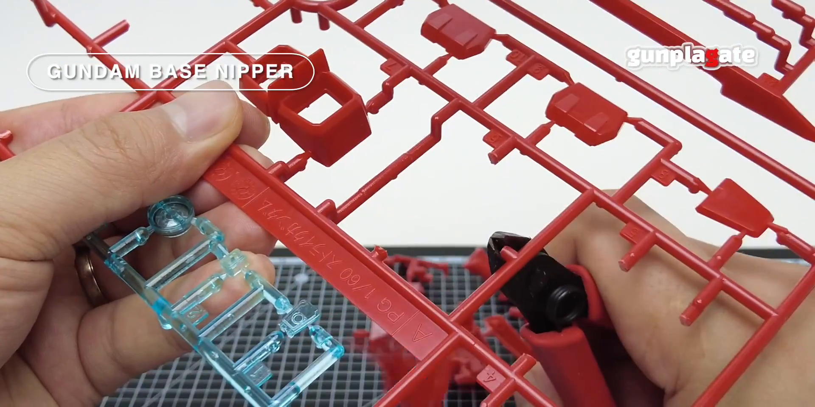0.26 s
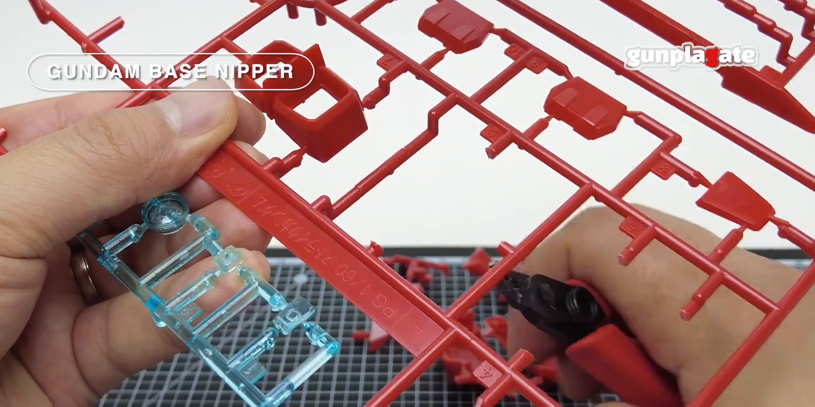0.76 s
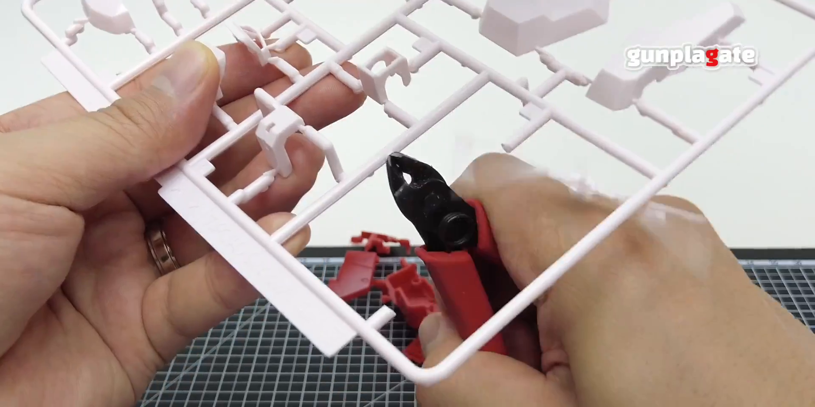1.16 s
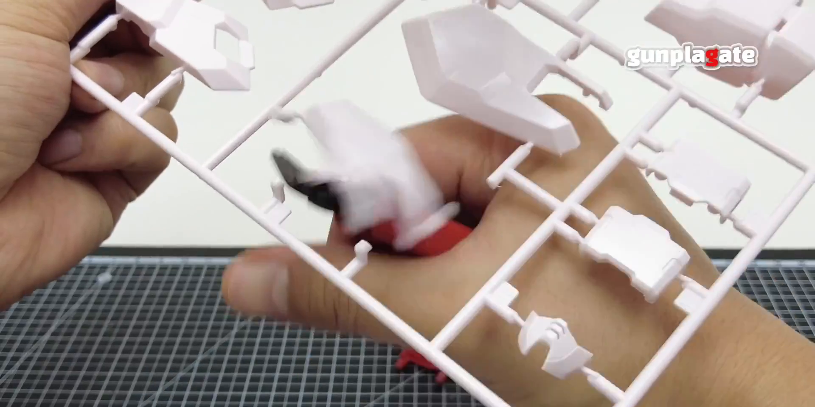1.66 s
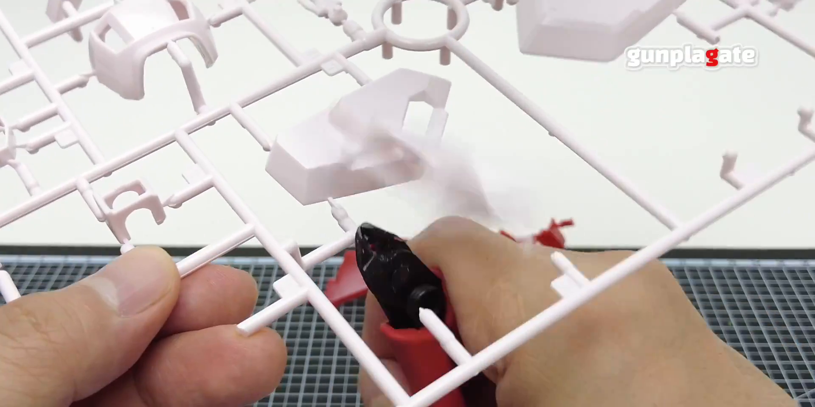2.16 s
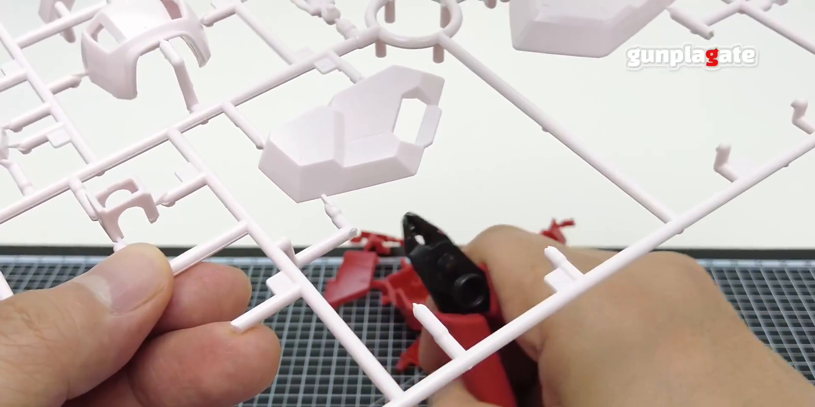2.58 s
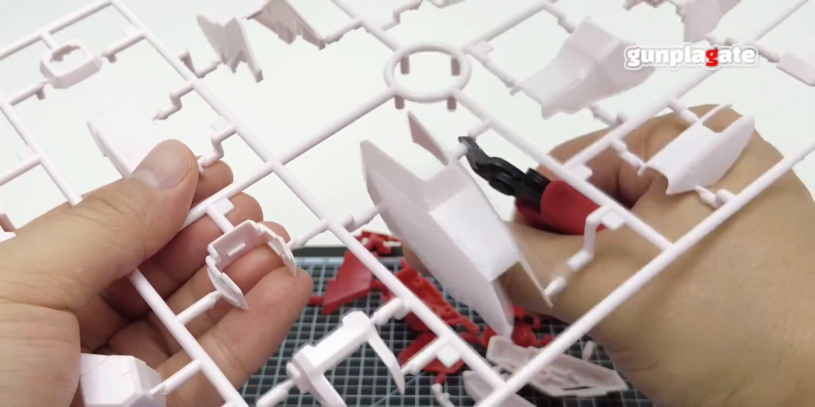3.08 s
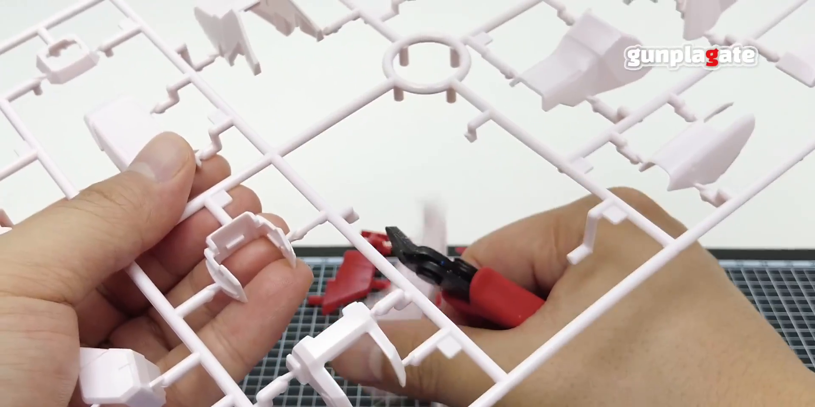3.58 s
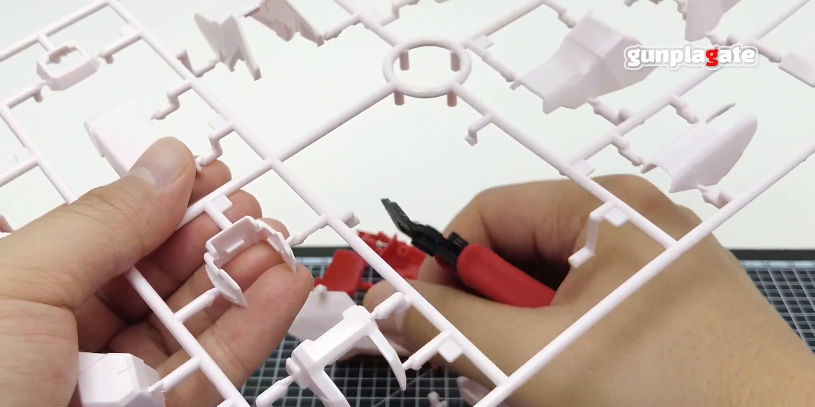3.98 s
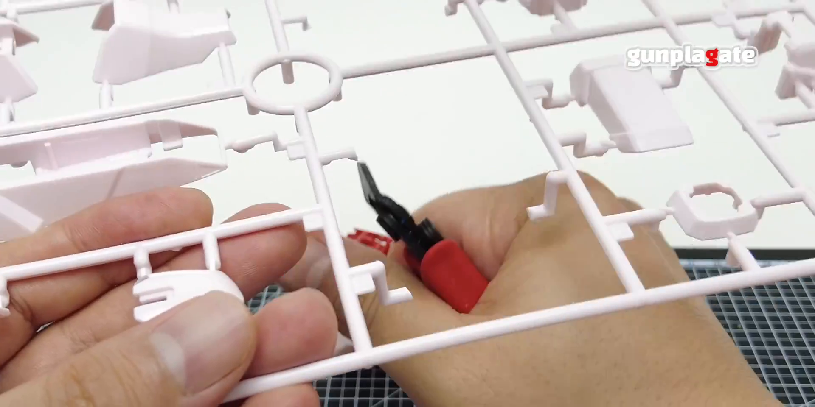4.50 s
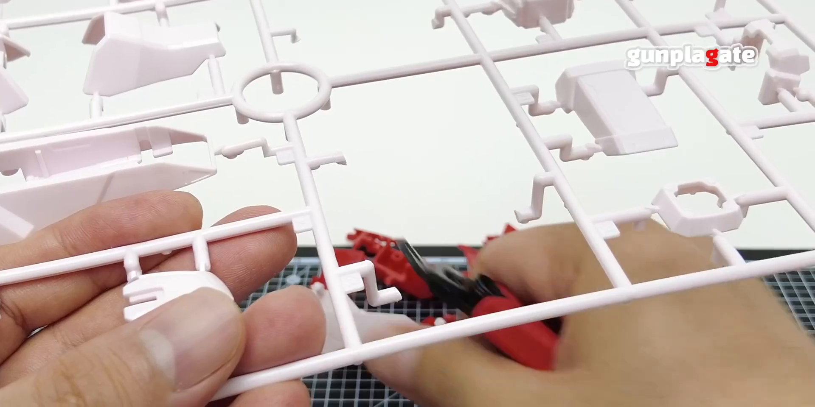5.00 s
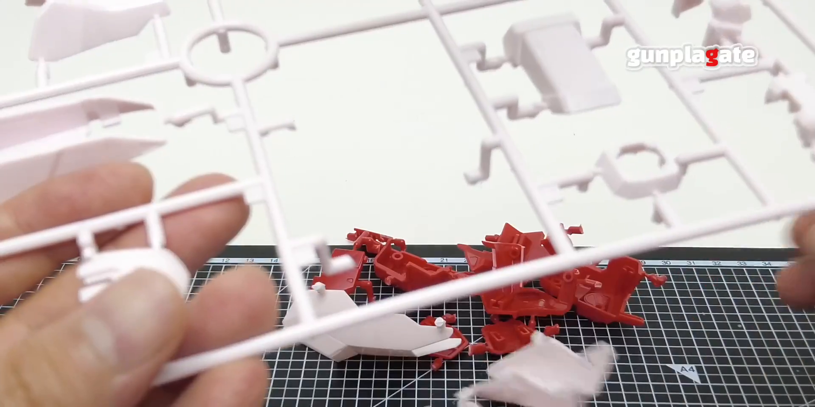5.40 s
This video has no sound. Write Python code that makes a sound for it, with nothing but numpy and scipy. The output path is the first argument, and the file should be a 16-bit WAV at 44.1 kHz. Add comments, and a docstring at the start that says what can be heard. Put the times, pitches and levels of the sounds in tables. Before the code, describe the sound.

Close and dry: about seventeen sharp snaps of cutter blades through plastic stalks, mostly in small clusters. Between them light hollow pieces bounce and chatter on a mat and a pile of parts, densest shortly after two, nearly four and five and a half seconds. Tiny faint squeaks come from the cutter joint. A short room tail and soft low rumble surround everything.

```python
"""Side cutters snip plastic parts off their runner frame, close by in a small quiet room.
Each snip is a grainy crack of shaped noise plus the ringing tones of the plastic.
Freed parts knock on the desk mat and on a heap of loose parts: the same recipe, with a thud below.
Random ticks make parts slide and chatter, and the cutter's joint squeaks in short tones.
Fading noise gives the room and the shaken frame; steady air and a low rumble lie underneath."""
import sys
import numpy as np
from scipy import signal
from scipy.fft import rfft, irfft
from scipy.io import wavfile
from scipy.ndimage import uniform_filter1d

SR = 44100
rng = np.random.default_rng(int(sys.argv[2]) if len(sys.argv) > 2 else 0)


def digitize_waveform(pressure):
    """Quantize a signal to 16-bit integers and store it at the path in sys.argv[1].

    Rows of a 2-D input are taken as channels; values are limited to [-1, 1].
    """
    field = np.atleast_2d(pressure).T
    bounded = np.clip(field, -1, 1)
    quanta = np.round(bounded * 32767).astype(np.int16)
    wavfile.write(sys.argv[1], SR, quanta)


N = 249165  # length in samples


def gain_of(db):
    """Turns decibels into a factor for the amplitude."""
    return 10 ** (np.asarray(db) / 20)


def evened(x):
    """Scales a sound to an rms (average strength) of one."""
    return x / np.sqrt(np.mean(x ** 2) + 1e-20)


def read(points, hz):
    """Reads a curve of (f/Hz, value) points, spacing pitches the way the ear does."""
    f, value = np.transpose(points)
    return np.interp(np.log(hz + 1), np.log(f + 1), value)


def add(mix, s, sound):
    """Mixes a sound in at s seconds, cutting it off where the mix ends."""
    part = mix[round(s * SR):][:len(sound)]
    part += sound[:len(part)]


def coloured(points, size):
    """White noise whose spectrum is shaped by (f/Hz, level/dB) points."""
    spectrum = rfft(rng.standard_normal(size))
    hz = np.fft.rfftfreq(size, 1 / SR)
    return irfft(spectrum * gain_of(read(points, hz)), size)


# colour of the room air, only its shape counts: (f/Hz, level/dB)
AIR_COLOUR = [(59, -38.5), (100, -3.5), (144, -14.5), (216, -16), (670, -21.5), (761, -24.5), (2310, -30.5),
              (10300, -37), (15100, -56), (16500, -47.5)]
# low rumble through desk and stand: (t/s, level/dB)
RUMBLE_LEVEL = [(0.0, -49), (0.69, -60.5), (1.12, -47), (1.45, -49), (1.7, -45.5), (1.95, -54), (2.49, -48),
                (2.69, -45), (2.86, -49), (3.27, -55.5), (4.94, -58.5), (5.65, -57)]


def background():
    """Steady noise for the room air and a slowly changing low rumble."""
    air = gain_of(-65) * evened(coloured([(60, -45.0)] + AIR_COLOUR, N))
    rumble = evened(coloured([(10, -2.0), (25, 4), (60, -8.5), (110, -19), (200, -51.5)], N))
    s, db = np.transpose(RUMBLE_LEVEL)
    return air + gain_of(np.interp(np.arange(N) / SR, s, db)) * rumble


# how slowly the room and the shaken frame die away: (f/Hz, time to fall by 60 dB/s)
TAIL_T60 = [(150, 0.44), (660, 0.2), (1740, 0.17), (4590, 0.11), (12100, 0.13)]


def tail():
    """Noise of unit energy that builds in a few milliseconds, each band dying at its own speed."""
    hz, t, z = signal.stft(rng.standard_normal(SR // 2), SR, nperseg=256)
    fade = gain_of(-60 * t / read(TAIL_T60, hz)[:, None])
    out = signal.istft(z * fade, SR, nperseg=256)[1]
    out *= 1 - np.exp(-(np.arange(len(out)) / SR / 0.0055) ** 2)
    return out / np.linalg.norm(out)


# parts sliding in the heap, one list a slide, levels against each other: (t/s, level/dB)
SLIDE_LEVELS = [
    [(0.57, -59), (0.63, -59.5), (0.68, -64)],
    [(1.16, -56), (1.23, -54)],
    [(3.63, -71), (3.68, -46), (3.802, -47), (3.96, -54), (4.0, -103)],
    [(4.04, -50.5), (4.085, -83)],
    [(5.07, -76), (5.11, -87)],
    [(5.41, -39), (5.488, -50), (5.528, -46.5), (5.63, -63.5)],
]
# colour of the chattering heap, only its shape counts: (f/Hz, level/dB)
HEAP_COLOUR = [(120, -58), (200, -11), (579, -18), (722, -25.5), (1120, 0.5), (3900, -11.5), (7010, -4.5),
               (9230, -8), (12400, -38.5), (16000, -23.5)]


def slides():
    """Parts chatter: many tiny ticks of very unequal size, each a quickly fading burst of heap colour."""
    t, level = np.arange(N) / SR, np.zeros(N)
    for rows in SLIDE_LEVELS:
        s, db = np.transpose(rows)
        level += gain_of(np.interp(t, s, db, left=-120, right=-120))
    sizes = gain_of(7.9 * np.minimum(rng.exponential(1, N), 3))
    ticks = sizes * (rng.random(N) < 1300 / SR)  # about 1300 ticks a second
    bursts = signal.lfilter([1], [1, -np.exp(-1 / (0.001 * SR))], ticks)  # fade constant 1 ms
    return 3.2 * level * evened(coloured(HEAP_COLOUR, N) * bursts)


# the cutter's joint squeaks as the blades close:
# (start t/s, end t/s, f/Hz, level/dB of partials 1, 2 and 3)
SQUEAK_ROWS = [(0.34, 0.346, 1400, -73, -64, -82), (2.517, 2.544, 1390, -88, -64, -68),
               (2.657, 2.68, 1460, -74, -67, -64), (3.087, 3.125, 1516, -68, -62.5, -89),
               (3.441, 3.453, 1340, -80, -76, -64), (3.61, 3.628, 1470, -74, -70, -65),
               (4.736, 4.762, 1430, -62.5, -51, -85)]


def squeak(start, end, hz, *partials_db):
    """The joint sticks and slips: a short tone of three partials that swells over its first 6 ms."""
    t = np.arange(0, end - start, 1 / SR)
    tone = sum(gain_of(db) * np.sin(2 * np.pi * (k + 1) * hz * t) for k, db in enumerate(partials_db))
    return np.sqrt(2) * tone * np.minimum(t / .006, 1)


THUD_T60_S, THUD_SHORTENS = 0.13, 0.44  # time to fall by 60 dB at 100 Hz; power by which pitch shortens it
PUSH_DB = 9  # strength setting of the push


def thud(level_db, hz):
    """One low damped swing of the board, and a brief push of air and mat."""
    t = np.arange(SR // 8) / SR
    fade = gain_of(-60 * t / (THUD_T60_S * (100 / hz) ** THUD_SHORTENS))
    swing = fade * np.sin(2 * np.pi * hz * t) * (1 - np.exp(-t / 0.0049))
    push = evened(coloured([(30, -9.5), (90, -9.5), (300, -9.0), (600, -31)], len(t)))
    push *= t / 0.0097 * np.exp(1 - t / 0.0025)
    return gain_of(level_db) * (swing + gain_of(PUSH_DB) * push)


# when the next thing takes over the ringing: (t/s)
PART_UNTIL = (.1, .3, .75, 1.69, 1.81, 2.1, 2.92, 3.25, 3.6, 4.08, 4.4, 4.7, 5.2)
# which row of PART_MODES rings until each of those times, and after the last: (row number)
RINGING_ROW = (0, 1, 2, 0, 3, 0, 4, 0, 5, 6, 0, 7, 8, 9)


def ringing_row(s):
    """Finds which thing, the frame or a part, rings at s seconds."""
    return RINGING_ROW[np.searchsorted(PART_UNTIL, s)]


# centres of body, middle, crack and air: (f/Hz)
COLOUR_CENTRES = (760, 2500, 6500, 12800)
# ringing tones (modes) of the frame, first row, then of each freed part:
# (f/Hz, level/dB against each other, time to fall by 60 dB/s)
PART_MODES = [
    [(370, -11, .18), (690, -5, .1), (1600, -3, .05), (2330, 0, .05), (4600, -3, .04), (5400, -3, .05),
     (6300, -2, .04), (7100, -2, .05), (7800, -1, .04), (8850, -1, .04)],
    [(1577, -2, .2), (3635, 0, .15), (5670, -3, .13), (8635, -8, .03), (11350, -5, .06), (13510, 2, .06)],
    [(735, -4, .07), (770, 11, .025), (3635, -8, .15), (5670, 0, .11), (11350, 0, .08), (13510, 5, .05)],
    [(2592, 1, .14), (3085, -6, .12), (5760, 0, .14), (7300, -9, .12), (8250, -5, .15), (11480, -6, .1)],
    [(748, 0, .06), (900, 5, .02), (1556, -11, .18), (2336, -4, .15), (3350, -7, .11), (4447, -1, .075),
     (5160, -8, .09), (6296, 3, .08), (6788, -2, .09), (7639, 2, .08), (8296, 1, .07), (9070, -6, .05),
     (10950, -2, .07), (12210, -3, .075), (14010, -5, .06)],
    [(477, 0, .22), (1180, -3, .16), (1287, -2, .22), (1965, 2, .17), (2358, -4, .14), (3273, -5, .1),
     (4221, 4, .065), (5900, -2, .09), (6465, 3, .07), (6820, 1, .085), (6980, 3, .05), (7450, -1, .075),
     (8150, 2, .055), (11190, 3, .04)],
    [(990, -4, .05), (1290, -2, .08), (2050, -5, .06), (5150, -2, .09), (5870, -5, .08), (6475, -3, .1),
     (7002, 2, .07), (7490, 0, .05), (8030, -6, .05), (9100, -5, .07), (9950, -6, .06), (12150, -6, .07)],
    [(651, 6, .32), (682, 3, .25), (1249, -3, .24), (1470, 0, .16), (1529, 1, .15), (2094, 2, .09),
     (2466, -1, .12), (3450, -3, .09), (4075, 2, .09), (4468, -5, .08), (4845, -4, .1), (6815, 5, .075),
     (8400, -1, .05), (10230, -3, .06), (12400, -5, .07)],
    [(520, 0, .04), (840, -9, .06), (1450, -6, .08), (1880, -4, .06), (2455, -3, .1), (3100, -3, .05),
     (3420, -3, .05), (3990, -2, .04), (5880, -4, .04)],
    [(630, -9, .1), (2444, -5, .14), (4452, -7, .09), (6282, -2, .11), (6860, 1, .09), (7671, -4, .09),
     (8480, -1, .09), (9432, -5, .07), (10225, -1, .07), (12460, -7, .07)],
]


def plastic_ring(s, colour, crack_s, spot_hz):
    """Plastic rings in many fading sine tones, which build up while the crack lasts."""
    t = np.arange(12000) / SR
    hz, db, t60 = np.transpose(PART_MODES[ringing_row(s)])[:, :, None]
    phase = rng.random(hz.shape)
    chance_db = 2.2 * rng.standard_normal(hz.shape)
    # modes near the pitch that the struck spot favours get a lift
    spot_db = 10.2 * np.exp(-(np.log(hz / spot_hz) / .05) ** 2)
    mode_db = db + read(colour, hz) + spot_db + chance_db
    modes = gain_of(mode_db - 60 * t / t60) * np.sin(2 * np.pi * (hz * t + phase))
    return 0.13 * modes.sum(0) * (1 - np.exp(-t / (0.04 * crack_s)))


def crack(tick_size, colour, crack_s, spot_hz):
    """Heavily damped modes make an uneven burst of noise, highest near the favoured pitch."""
    t = np.arange(4096) / SR
    body_db, air_db = colour[0][1], colour[-1][1]
    bands = np.geomspace(250, 16500, num=40)
    outline = [(320, min(body_db, 0) - 11)] + colour + [(16500, air_db - 10)]
    bands_db = read(outline, bands) + 3. * rng.standard_normal(len(bands))
    bands_db += 4. * np.exp(-(np.log(bands / spot_hz) / .1) ** 2)
    # the plastic gives way in several small fractures, so the crack is lumpy in time
    wander = evened(uniform_filter1d(rng.standard_normal(len(t)), size=30))
    lumps = gain_of(0.44 * wander - 8.5)
    swell = (1 - np.exp(-t / 0.0016)) * np.exp(-t / crack_s)
    tick = tick_size * t / .0003 * np.exp(1 - t / .0003)  # sharp first contact
    return coloured(list(zip(bands, bands_db)), len(t)) * (tick + lumps * swell)


def blow(tick_size, s, crack_db, body_db, middle_db, air_db, crack_ms, ring_db, spot_hz):
    """A crack and the ring of the plastic together; small parts radiate no bass."""
    crack_s = max(crack_ms, .5) / 1000
    colour = list(zip(COLOUR_CENTRES, (body_db, middle_db, 0, air_db)))
    sound = gain_of(ring_db) * plastic_ring(s, colour, crack_s, spot_hz)
    add(sound, 0, crack(tick_size, colour, crack_s, spot_hz))
    no_bass = signal.butter(2, 380, "high", fs=SR)
    return gain_of(crack_db) * signal.lfilter(*no_bass, sound)


KNOCK_TICK = .8  # sharp first contact against the crack that follows
AIR_DB_PER_OCTAVE = 11  # spots above the pitch of the crack bring more air
# how the frame and each part take a knock, rows as in PART_MODES:
# (air level/dB before that extra, crack fade constant/ms, tail level/dB,
# thud level/dB against the body of the knock, thud f/Hz)
KNOCK_MANNERS = [(-10, 7.2, -11.5, -25, 220), (-12, 6.7, -18, -47, 83), (-10.5, 6.5, -17.5, -44.5, 75),
                 (-20, 1.6, -8.5, -29.5, 75), (-5.5, 6.8, -18, -37.5, 110), (-7, 6.5, -19, -44, 160),
                 (-5, 8.5, -13.5, -29.5, 133), (-2, 5.8, -14, -35.5, 76), (-18.5, 5, -10, -24.5, 270),
                 (-6, 7.3, -13.5, -29, 129)]
# a part strikes the mat or another part: (t/s, crack level/dB, body level/dB, middle level/dB
# (both against the crack), f/Hz that the struck spot favours, ring level/dB)
KNOCK_ROWS = [(0.089, -34, 3, 8, 3620, -15), (0.1151, -22.5, 4.5, 7, 3630, -2),
              (0.1366, -17, -5.5, -15, 13540, -11), (0.178, -36, 3, 1, 5640, -12),
              (0.1874, -22.5, -22, -9, 13560, -10), (0.21, -45, 1, 3, 11340, 11),
              (0.2229, -26, -15, -2.5, 5870, -17), (0.3522, -8.5, 0.5, -3, 690, 0),
              (0.3763, -44.5, 23.5, 22, 717, 6), (0.395, -52, 31, 12, 690, -5),
              (0.413, -17, -4, -14, 710, -3), (0.4303, -22.5, 13.5, 3.5, 685, -1),
              (0.4704, -45.5, 22, 15.5, 715, -3), (0.5132, -19.5, 7.5, 6, 759, -8),
              (0.5635, -10, -6, -13, 756, -1), (0.5911, -47, 16.5, -6, 740, 0),
              (0.6038, -46, 7.5, -4, 13560, 4), (0.614, -44, 4, -11, 13490, 5),
              (0.62, -33, 10.5, -10, 13500, -1), (0.631, -17.5, 0, -23, 13600, -8),
              (0.6408, -33, 8, -4, 12900, -5), (0.648, -25, -4, -9, 12800, -13),
              (0.6581, -46, 19, 2, 720, -5), (1.1678, -6.5, -7, -19, 5750, -7),
              (1.2332, -21, -20.5, -25, 10980, -5), (1.2615, -34, 0, -2, 4800, -4),
              (1.4596, -36, 2, -2, 8040, -6), (1.483, -12.5, -3, 1, 2900, -7),
              (1.6556, -7.5, -18, -8, 5600, -16), (1.71, -8, -5, -3, 2660, -1),
              (1.726, -13.5, -7.5, 3, 5760, -9), (1.738, -33, 0, 12.5, 2550, -0.5),
              (1.758, -32, -2, 1, 2660, -7), (1.7822, -33, 10, 0, 940, 6),
              (1.8234, -16.5, 8, -20, 8800, -0.5), (1.94, -43.5, -8, -5, 6200, -16),
              (1.988, -28, 2, 5, 7480, -21), (2.1764, -9.5, -19.5, -4, 6960, 1.5),
              (2.1996, -3, -22, -7.5, 6400, -4), (2.2175, -4.5, -21, -16, 11000, -15),
              (2.2405, -18.5, -15, 4, 11200, -1), (2.2453, -11.5, -22, -14, 7640, 2.5),
              (2.2875, -20, -14, 1.5, 10400, 0.5), (2.3063, -4, -21.5, -4.5, 5280, -5.5),
              (2.369, -28.5, 0, -12, 9850, -7), (2.387, -22.5, -10.5, -1, 11840, 4),
              (2.5341, -8, 8.5, -1, 718, -0.5), (2.5521, -3.5, -0.5, -13, 684, -13),
              (2.5722, -10, -1.5, -4.5, 8310, 2.5), (2.6702, -12.5, -1.5, 0.5, 6300, -1.5),
              (2.6861, -8.5, 7.5, -8, 6300, -12.5), (2.745, -23.5, 15.5, 8, 1160, -13.5),
              (2.783, -15.5, 2.5, -0.5, 6370, -8.5), (2.831, -21, 0.5, 0.5, 7500, -5.5),
              (2.8554, -27, 0, -1, 6240, -7), (2.8676, -32.5, 6, 3.5, 6310, -17),
              (3.077, -43, 2, 1, 2120, -14), (3.0894, -52, -8.5, -4, 7060, -15),
              (3.253, -39.5, 4, 1, 2210, -12), (3.323, -17, -4.5, 1.5, 7000, 2.5),
              (3.3445, -13.5, 0.5, -9, 7140, -7.5), (3.4552, -12, -16.5, -10.5, 6870, -3),
              (3.478, -34.5, 2, 3.5, 1980, -10), (3.497, -22.5, -25.5, -7.5, 5930, -6),
              (3.5488, -42, -6, -13, 1980, -8.5), (3.628, -11.5, 2, -5.5, 7100, -2),
              (3.6355, -4.5, -8, -4, 7010, -7.5), (3.6643, -16, -16, -20, 7400, -2),
              (3.6775, -10, -9.5, -15, 8100, 4), (3.6875, -20, -9, -3, 4590, -1),
              (3.709, -25, -14, 0, 12040, 6), (3.733, -25, -1, -6, 7260, 9.5),
              (3.766, -29, -0.5, -14, 6480, -7), (3.7938, -6.5, -5, -8.5, 7250, -6),
              (3.85, -20, 14.5, 7.5, 1170, 0), (3.865, -26.5, -12, -22, 7100, 10),
              (3.8827, -32, 9, 8, 7000, 7), (3.9, -17, -12, -20, 6870, 1.5), (3.926, -29, 6, -10, 8340, 1),
              (4.005, -26, -5, -23, 8000, 4.5), (4.0449, -29.5, -6, -13, 7000, 4),
              (4.054, -28, -17, 0, 6130, -18), (4.4281, -13, -17, -13, 6880, -7.5),
              (4.433, -3.5, -17.5, -4, 6880, -3.5), (4.4454, -25, 3.5, 16, 4075, -4.5),
              (4.7653, -14.5, 8.5, 13, 840, -3.5), (4.7724, -20, -3, 3.5, 2450, -4.5),
              (4.8906, -29, 15, 1.5, 634, -10), (4.9023, -27, 2, 9, 3420, -6.5),
              (4.9272, -32.5, 11.5, -10, 620, -11), (4.9799, -17, 3, 0.5, 3140, -10.5),
              (5.033, -43, 5.5, 6, 3100, -8), (5.043, -24.5, 8, -4.5, 3600, -17.5),
              (5.0745, -30, -4.5, 0, 3250, -2.5), (5.3149, -18.5, 7, -6, 2450, 3.5),
              (5.3395, -19, 7.5, -14, 6950, -10.5), (5.3505, -27, 16, 6, 970, -3),
              (5.4047, -19.5, 8, -2, 6870, -2), (5.4118, -18, -6, -16, 7660, 7),
              (5.417, -4.5, -22, -20, 6630, 2.5), (5.4405, -33, -10, -19, 8340, -8),
              (5.449, -13.5, -6, -4, 6560, -1), (5.4677, -10.5, -5, -4.5, 6860, -4.5),
              (5.5093, -16.5, -2.5, -3, 6840, 1.5), (5.5269, -11, -22, -12, 6400, -3),
              (5.572, -42, 5, 14, 1530, -12), (5.6446, -29, 12.5, 2, 6860, 4.5)]


def knock(s, crack_db, body_db, middle_db, spot_hz, ring_db):
    """A part hits something: a blow in the manner of whatever rings now, its thud and its tail level."""
    air_db, crack_ms, tail_db, thud_db, thud_hz = KNOCK_MANNERS[ringing_row(s)]
    air_db += AIR_DB_PER_OCTAVE * max(np.log2(spot_hz / COLOUR_CENTRES[2]), 0)
    sound = blow(KNOCK_TICK, s, crack_db, body_db, middle_db, air_db, crack_ms, ring_db, spot_hz)
    return s, sound, thud(crack_db + body_db + thud_db, thud_hz), tail_db


SNIP_TICK, SNIP_SPOT_HZ = .4, 7700  # first contact against the crack; favoured pitch
# a gate (the stalk that holds a part) snaps between the blades:
# (t/s, crack level/dB, body level/dB, middle level/dB, air level/dB (all three against the crack),
# crack fade constant/ms, ring level/dB, tail level/dB, level/dB of the thud of desk and frame, thud f/Hz)
SNIP_ROWS = [(0.0714, -6.5, 2.5, 7.5, 2.5, 4.2, -12.5, -7, -42.5, 82.6),
             (0.818, 2.5, -6, 4, 2.5, 2.4, -18.5, -7, -39.5, 99.6),
             (0.9835, -4.5, -2, -1.5, -3, 3.9, -11.5, 1.5, -46, 98),
             (1.147, -3, -3, 10, 1.5, 3.1, -10, -17, -47, 186),
             (1.3134, -4.5, -1.5, -3.5, -2, 14, -5, -7.5, -34.5, 424),
             (1.5095, 4, 3, -2.5, -5.5, 5.5, -30.5, -16.5, -28.5, 83.5),
             (1.6473, -2.5, -5, -4.5, 1.5, 7.2, -5, -5, -35, 82.6),
             (1.8205, -7.5, 0.5, 2, -9.5, 7.2, -14, -19.5, -35, 286),
             (1.9925, 3, -2, -3.5, -2, 4.3, -8.5, -13, -32.5, 340),
             (2.156, 2.5, 4.5, 1.5, 4, 4.2, -15.5, -13.5, -29, 450),
             (2.9428, -2.5, 1, 1, -2.5, 9.6, -26.5, -12.5, -42.5, 224),
             (3.1104, -5, -7, -10, 5.5, 15.5, -26.5, -15, -40.5, 377),
             (3.269, -6.5, -12.5, -4, 1.5, 6.8, 2.5, -15, -37.5, 397),
             (4.0929, 0.5, -5.5, -3.5, 2, 2.6, -12.5, -1.5, -39, 268),
             (4.2597, -5.5, 2.5, 0, 1, 13.7, -13.5, -9.5, -36, 338),
             (4.4226, -2, -3.5, -5.5, 1.5, 10.6, -21, -10, -40.5, 96),
             (4.7581, 5.5, 0, -8.5, -17.5, 6.5, -14.5, -9, -23, 437)]


def snip(s, crack_db, body_db, middle_db, air_db, crack_ms, ring_db, tail_db, thud_db, thud_hz):
    """A gate snaps and sets the plastic ringing: the blow, its thud and its tail level."""
    sound = blow(SNIP_TICK, s, crack_db, body_db, middle_db, air_db, crack_ms, ring_db, SNIP_SPOT_HZ)
    return s, sound, thud(thud_db, thud_hz), tail_db


def scene():
    """Snips, knocks and slides with their tails, plus squeaks, over the background."""
    dry = slides()
    sends = np.zeros((4, N))  # four tails in turn, so that no two neighbours die alike
    sends[0] += gain_of(-9.5) * dry
    blows = [snip(*row) for row in SNIP_ROWS] + [knock(*row) for row in KNOCK_ROWS]
    for k, (s, sound, low, tail_db) in enumerate(blows):
        send = sends[k % len(sends)]
        add(dry, s, sound)
        add(dry, s, low)
        add(send, s, gain_of(tail_db) * sound)
        add(send, s, gain_of(-11.0) * low)
    for row in SQUEAK_ROWS:
        add(dry, row[0], squeak(*row))
    wet = sum(signal.fftconvolve(send, tail())[:N] for send in sends)
    return (dry + wet + background())[None]


DULL_HZ, EDGE_HZ = 15800, 16855  # the treble is weak above the first, gone above the second


def record(dry):
    """A soft knee rounds the highest peaks; then the topmost treble is weakened and the band limited."""
    knee = .7
    soft = knee * np.tanh(dry / knee)
    below = signal.firwin(511, DULL_HZ, window=("kaiser", 9), fs=SR)
    edge = signal.firwin(511, EDGE_HZ, window=("kaiser", 9), fs=SR)
    treble_filter = below + gain_of(-18.0) * (edge - below)
    return signal.oaconvolve(soft, treble_filter[None], "same")


dry = scene()
out = record(dry)
digitize_waveform(out)
```